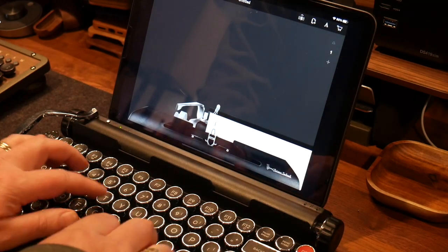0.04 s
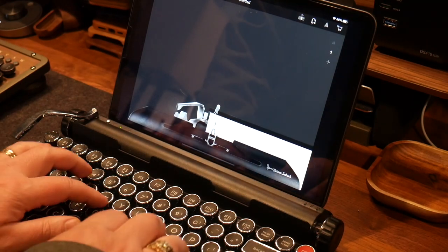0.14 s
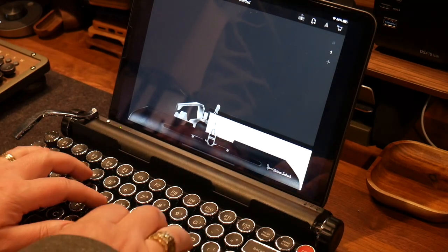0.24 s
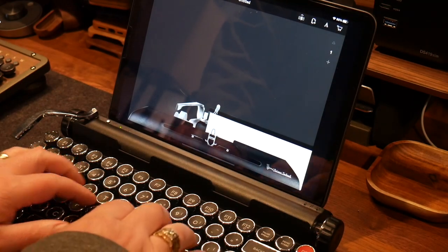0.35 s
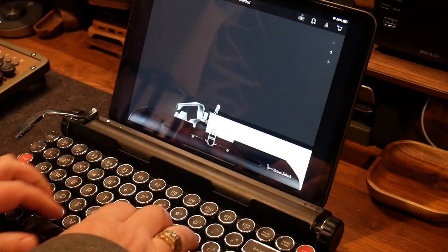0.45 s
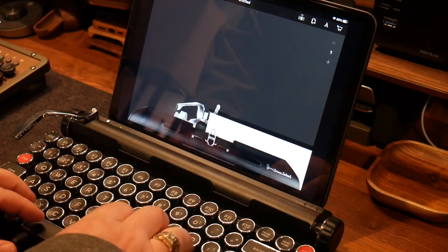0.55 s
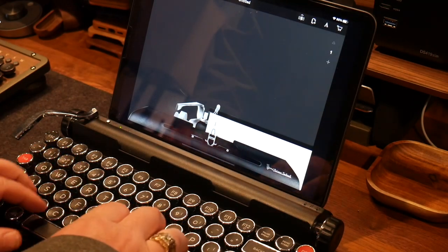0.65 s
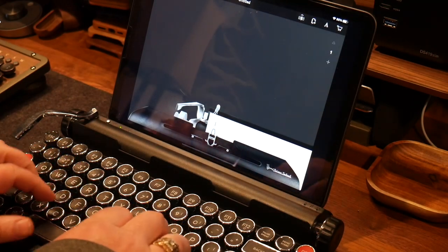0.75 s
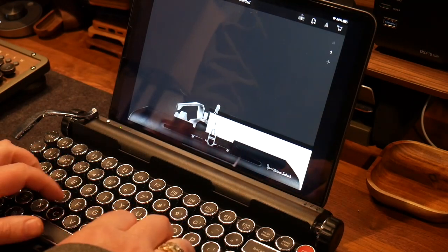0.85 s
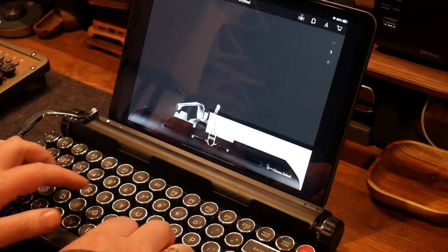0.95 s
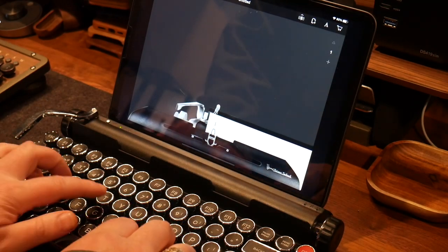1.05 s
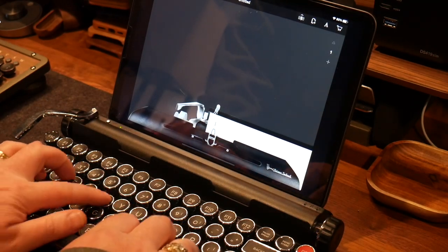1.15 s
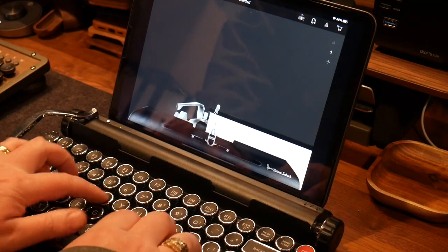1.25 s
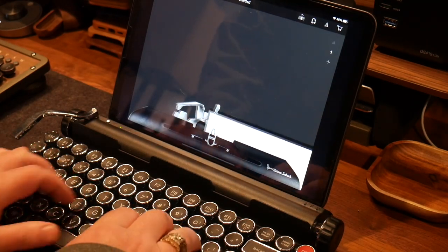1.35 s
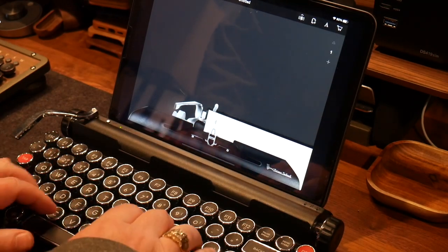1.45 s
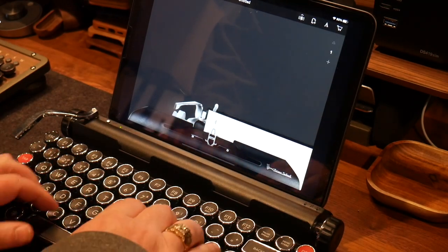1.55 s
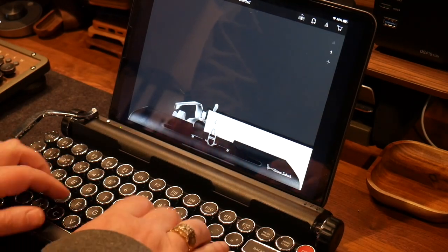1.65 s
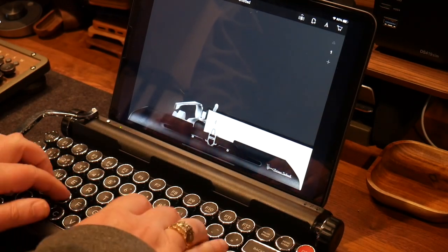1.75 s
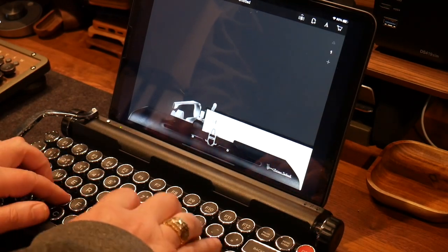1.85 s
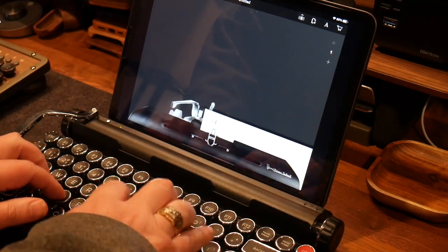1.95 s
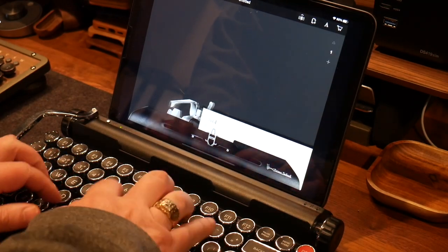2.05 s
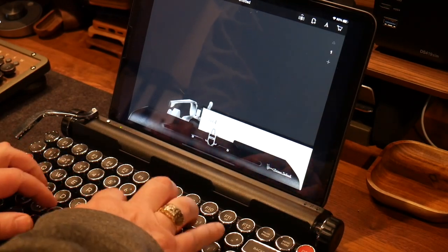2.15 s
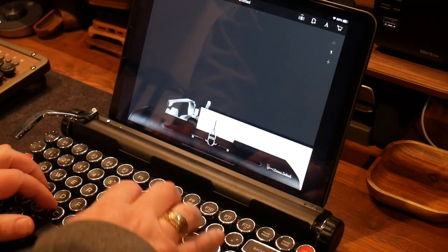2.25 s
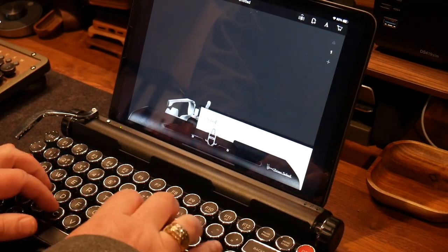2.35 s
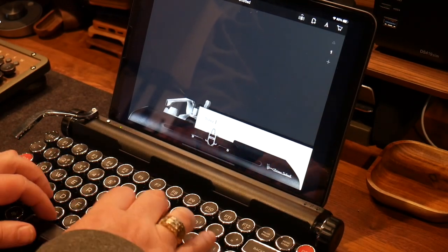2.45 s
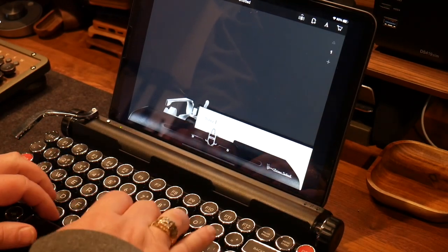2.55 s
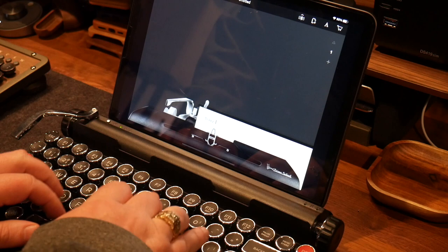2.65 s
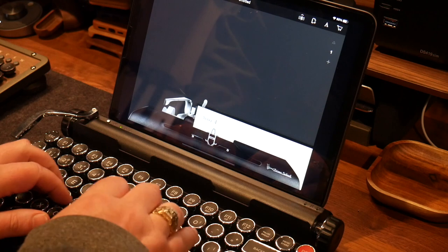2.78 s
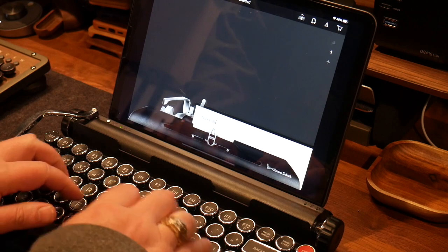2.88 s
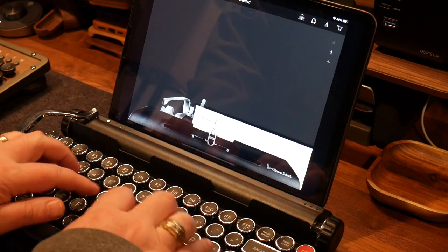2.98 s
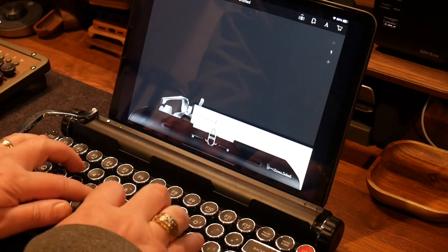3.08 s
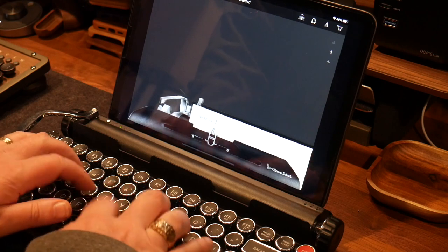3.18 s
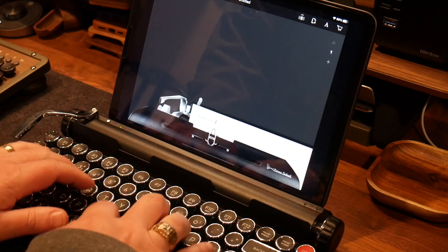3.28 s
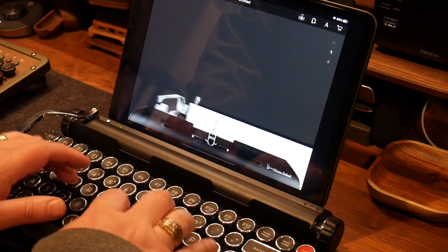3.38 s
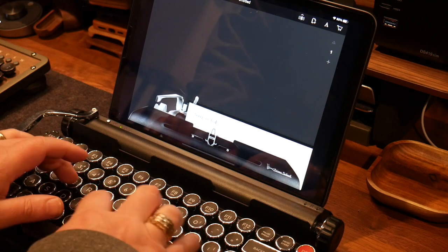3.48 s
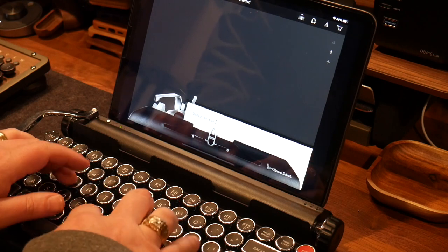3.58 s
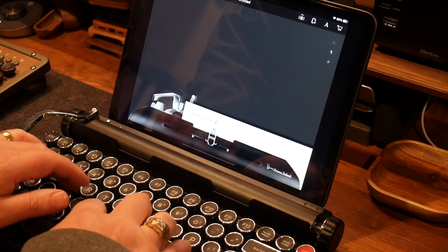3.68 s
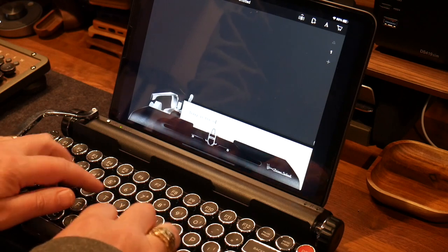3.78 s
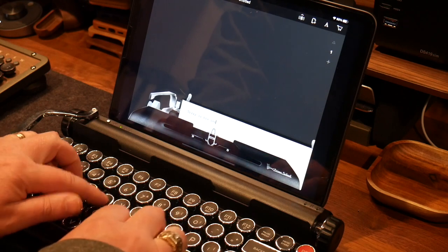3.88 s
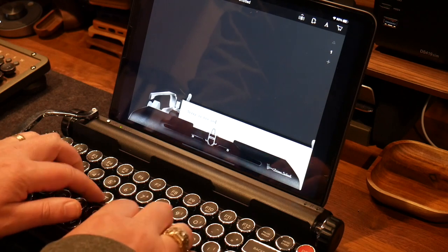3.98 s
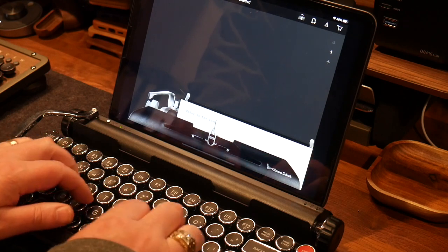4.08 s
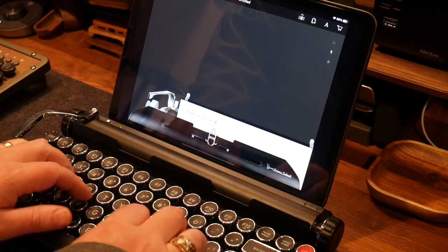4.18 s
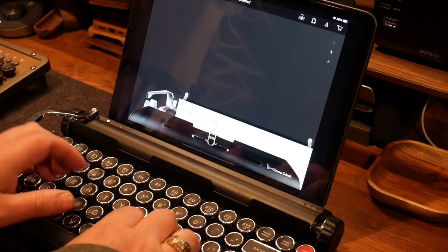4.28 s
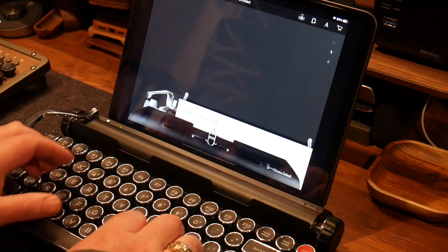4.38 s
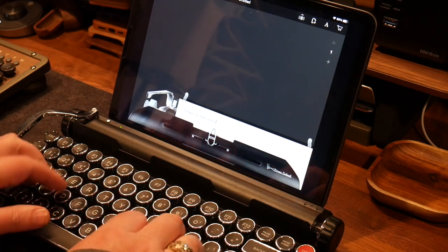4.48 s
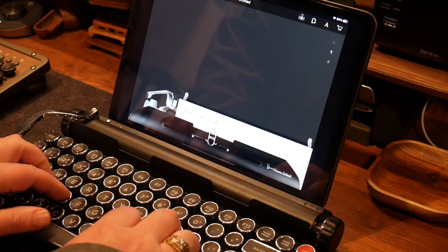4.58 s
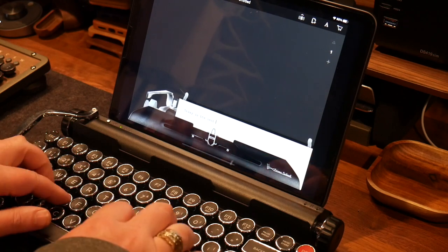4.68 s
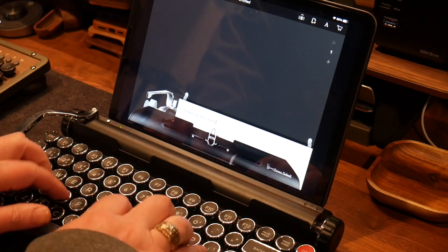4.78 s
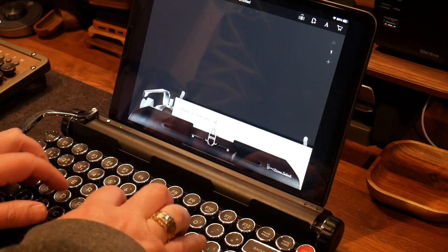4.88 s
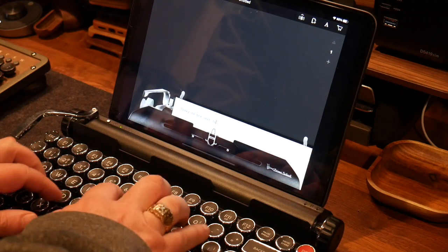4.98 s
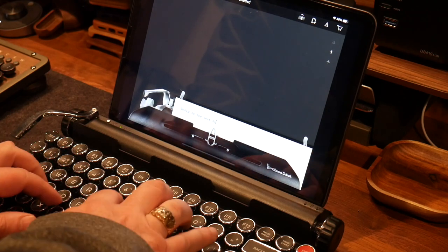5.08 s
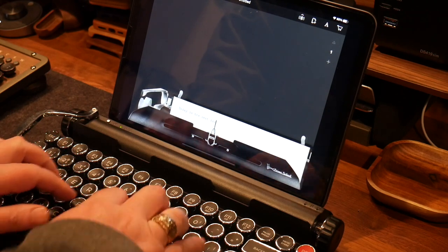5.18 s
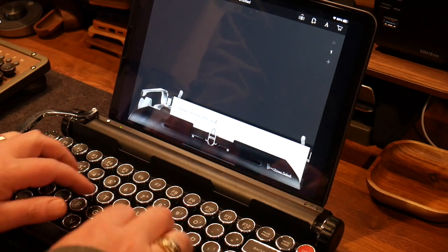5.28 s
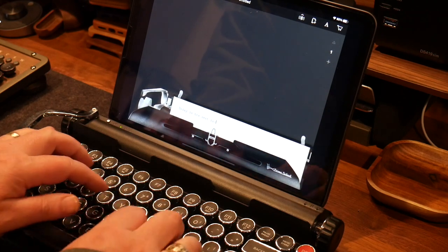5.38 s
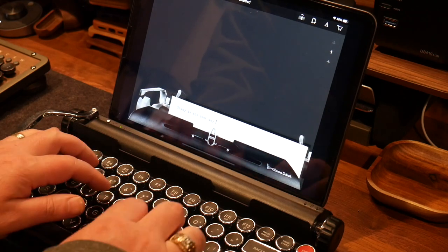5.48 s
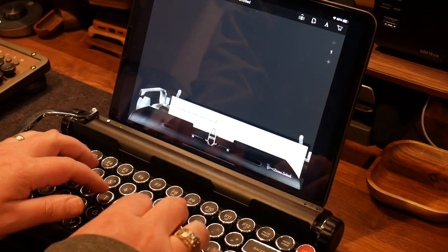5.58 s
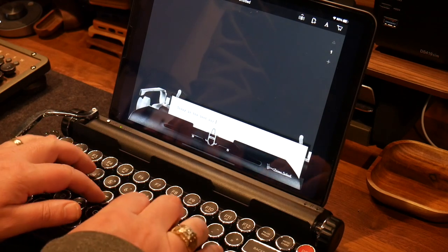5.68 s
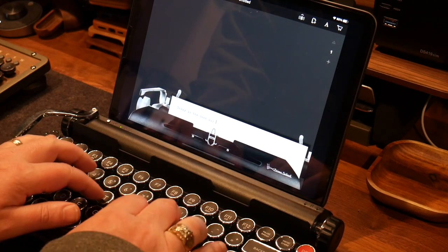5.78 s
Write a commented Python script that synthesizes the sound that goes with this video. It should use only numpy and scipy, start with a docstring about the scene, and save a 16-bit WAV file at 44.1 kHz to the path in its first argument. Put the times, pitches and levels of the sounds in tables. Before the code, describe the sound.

A small quiet room with soft low air and a faint wavering hum, heard close in stereo. For the first second there is almost nothing: a fading faint crackle and a thin fingertip tick at 0.8 s. A light key return knocks at 1.2 s, then the first firm keystroke lands at 1.5 s with a dull, short palm rub around it. Rapid clicky keystrokes follow from 1.9 to 2.3 s, bright and springy, each with a softer return knock. A hollow, lower space-bar clack comes at 2.5 s. Typing thickens from 2.7 to 4.15 s, with space strokes at 3.1 and 3.6 s and small finger rubs. Another space clack at 4.3 s leads into lighter ticks and releases. Strong keys hit at 4.9 s, nearly doubled, and 5.2 s; a last space clack at 5.55 s leaves quiet air and a very faint release at 5.8 s.

```python
"""Fast typing on a typewriter-style mechanical keyboard that stands on a wooden desk in a small quiet room.
Each switch clicks, the key bottoms out, and on release it clicks again and knocks against its top stop:
every contact is a short burst of random impacts, coloured by the resonances of caps and springs.
The thumb taps the long space bar and mostly drives it down with a hollow clack, built from decaying sines.
Filtered noise makes a dull rub, the room's tail, the soft air and the faint hum that fills the pauses."""
import sys
import numpy as np
from scipy import signal
from scipy.fft import rfft, irfft
from scipy.io import wavfile
from scipy.ndimage import uniform_filter1d

SR = 44100
rng = np.random.default_rng(int(sys.argv[2]) if len(sys.argv) > 2 else 0)


def to_wav(s):
    """Save 16-bit WAV."""
    ch = np.atleast_2d(s).T  # columns
    pcm = np.round(np.clip(ch, -1, 1) * 32767)  # PCM
    wavfile.write(sys.argv[1], SR, pcm.astype(np.int16))


N = 257103

# keys that go down, levels before the gains of each part: bottom_s, level_db, case_knock_db, treble_db,
# travel_since_click_ms, cap_ring_hz
PRESSES = [(1.4703, -14.5, 4.5, -7.5, 12.5, 2520), (1.8724, -16.5, 2.5, -0.5, 9, 4460),
           (1.9024, -26.5, 4, -11, 4, 2800), (1.9715, -14.5, 2.5, -0.5, 8.6, 4500),
           (2.0528, -17.5, 0, 1.5, 2.2, 3420), (2.2913, -14.5, 2.5, 0.5, 7.3, 4500),
           (2.3106, -24, 9.5, -5, 8, 1650), (2.736, -17, 1.5, 2, 2, 3430), (2.9602, -16, -1, -1, 4.3, 4340),
           (3.2731, -15.5, 2.5, 0, 5.3, 3140), (3.4182, -16, 5, 2.5, 2.3, 3430),
           (3.462, -18, 4.5, -0.5, 3.6, 3460), (3.7713, -15, 0, -2, 7.2, 4460),
           (3.8493, -15, 4, 2.5, 7.9, 3200), (3.9098, -18, 6, 4, 1.76, 3370),
           (4.1116, -15.5, 6, 2, 8.4, 4570), (4.8939, -13, 4.5, 3.5, 6.1, 3300),
           (4.9132, -19.5, 2.5, -1, 2, 3450), (5.2102, -16, 1.5, 1.5, 2, 3500)]
# thumb landings on the space bar: tap_s, level_db, rattle_decay_ms
BAR_TAPS = [(2.463, -29.5, 2.6), (2.6785, -39.5, 2.5), (3.0552, -31, 2), (3.5303, -30.5, 3.8),
            (4.0402, -41.5, 4.4), (4.2759, -31, 2), (5.4693, -28, 1.16)]
# space bar hitting bottom, levels before the gains of each part: bottom_s, level_db
BAR_STROKES = [(2.501, -25), (3.119, -25), (3.61, -23.5), (4.3356, -22.5), (5.5506, -22.5)]
# spectrum of a switch click: frequency_hz, density_db_per_hz
CLICK_COLOUR = [(100, -45.5), (500, -11.5), (1100, -10), (1700, -1.5), (2500, -3), (4000, 2.5), (6500, 0.5),
                (9000, -2), (10500, -8.5), (13500, -6.5), (16000, -22)]
# spectrum of a key at its top stop, also of the faint crackle: frequency_hz, density_db_per_hz
RETURN_COLOUR = [(100, -25), (300, -19), (500, -5), (750, -12), (1100, -7.5), (1700, -6.5), (2500, -3),
                 (4000, -5.5), (6500, -11.5), (9000, -3.5), (10500, -21.5), (13500, -26.5), (16000, -42)]

MS = 1e-3
# samples kept for one contact, and how many of them come before the strike
SIZE, LEAD = 4096, 400
HZ = np.maximum(np.fft.rfftfreq(SIZE, 1 / SR), 1)
TIME = np.arange(N) / SR
# each contact fades in and out at its ends
FADE = signal.windows.tukey(SIZE, .1)


def from_db(db):
    """Amplitude ratio: 20 dB for each factor of ten."""
    return 10 ** (np.asarray(db) / 20)


def rms_one(x):
    """Normalisation of the signal power to one."""
    return x / np.sqrt(np.mean(x ** 2) + 1e-20)


def at_hz(points, hz, axis=1):
    """Interpolation along log frequency of one column of a table."""
    table = np.array(points, float)
    return np.interp(np.log(hz), np.log(table[:, 0]), table[:, axis])


def add(track, s, sound):
    """Superposition: a sound is added to a track from time s on."""
    start = max(round(s * SR), 0)
    part = sound[:max(N - start, 0)]
    track[start:start + len(part)] += part


def mode(hz, t60, swell_ms):
    """Damped normal mode: a sine decays by 60 dB in t60 seconds after a moment of build-up."""
    t = TIME[:SR // 2]
    swell = 1 - np.exp(-(1000 * t / swell_ms) ** 2)
    phase = rng.uniform(0, 2 * np.pi)
    return swell * from_db(-60 * t / t60) * np.sin(2 * np.pi * hz * t + phase)


def resonance(hz, width, boost_db):
    """Lorentzian resonance: a peak that rings after the contact, or a dip."""
    return 1 + (from_db(boost_db) - 1) / (1 + 2j * (HZ - hz) / width)


def key_body(depth):
    """Resonances in series, shared by all caps and switch springs; light contacts wake them less."""
    # boosts before the depth of the contact: frequency_hz, width_hz, boost_db
    body_peaks = [(2534, 72, 10), (3405, 150, 6.5), (4210, 49, 6.5), (5220, 80, 7), (6560, 310, 4.5),
                  (7896, 1450, -13), (8545, 106, 9.5), (8896, 91, 9), (9100, 45, 10)]
    return np.prod([resonance(hz, width, depth * boost_db) for hz, width, boost_db in body_peaks], axis=0)


def chatter(decay_ms, slide_db, rise_share=0.32, grain_db=3.5, ring_db=-20, ring_ms=14.0, slide_ms=10.6,
            ragged_hz=885.3, ragged_db=3.5, scatter=.35):
    """Random impact excitation: the stem slides, tiny impacts bunch up, the plastic rings briefly."""
    ms = (np.arange(SIZE) - LEAD) / SR * 1000
    before, after = np.minimum(ms, 0), np.maximum(ms, 0)
    decay_ms = max(decay_ms, .2)
    strike = np.exp(before / (rise_share * decay_ms) - after / decay_ms)
    slide = from_db(slide_db) * np.exp(before / slide_ms)
    ring = from_db(ring_db) * np.exp(-after / ring_ms)
    skirt = np.where(ms < 0, slide, ring)
    impacts = rng.standard_normal((2, SIZE))
    burst = rfft((strike + skirt) * impacts[0] * from_db(grain_db * impacts[1]))
    # level the broad spectrum, which the colour tables then shape
    flat_burst = burst / np.sqrt(uniform_filter1d(abs(burst) ** 2, size=70))
    # each strike point feeds the modes unevenly, and some of them a little later than others
    knots = np.arange(0, SR / 2, ragged_hz)
    strength, lateness = (np.interp(HZ, knots, row) for row in rng.standard_normal((2, len(knots))))
    delay_s = lateness * scatter * decay_ms * MS
    phase = 2 * np.pi * np.cumsum(delay_s) * SR / SIZE
    return flat_burst * from_db(ragged_db * strength) * np.exp(-1j * phase)


def contacts(hits, colour, lag_cycles, slide_db, depth, ping_db=0, tick_db=0, cap_db=6.5,
             cap_width_hz=280.0, early_share=.36):
    """Impact filtered by the key body; dispersive bending waves in the case bring the lows later.

    Columns of hits: strike_s, level_db, case_knock_db, treble_db, rattle_decay_ms, cap_ring_hz.
    """
    out = np.zeros(N)
    dispersion = np.exp(-2j * np.pi * lag_cycles * np.log(HZ + 150))
    body = key_body(depth) * from_db(at_hz(colour, HZ)) * dispersion
    for s, level_db, knock_db, treble_db, decay_ms, cap_hz in hits:
        ping, tick = treble_db + ping_db, treble_db + tick_db
        touch = [(1400, knock_db), (2600, 0), (5000, 0), (7000, ping), (9500, ping), (11500, tick)]
        cap = resonance(cap_hz, cap_width_hz, cap_db)
        spectrum = chatter(decay_ms, slide_db) * body * cap * from_db(at_hz(touch, HZ))
        sound = FADE * irfft(spectrum)
        # the level of a contact is its energy spread over 5 ms
        sound = sound * np.sqrt(.005 * SR / np.sum(sound ** 2))
        add(out, s - LEAD / SR - early_share * decay_ms * MS, from_db(level_db) * sound)
    return out


def background(air_db=-60.5, hum_width_hz=4.1):
    """Stationary noise: soft room air, wide in the bass; narrow bands make an appliance's wavering hum."""
    # spectrum of the air before levelling: frequency_hz, density_db_per_hz
    air_colour = [(25, -32), (60, -32.5), (110, -20.5), (150, -17), (220, -15.5), (330, -17.5),
                  (450, -14.5), (620, -21.5), (780, -23), (1400, -29.5), (3300, -36), (7200, -34.5),
                  (8000, -38.5), (16000, -42.5)]
    # lines of the hum: frequency_hz, level_db
    hum_lines = [(143, -89), (214, -81), (361, -72.5), (436, -83), (580, -68), (636, -72.5)]
    # side against mid: frequency_hz, side_db
    air_width = [(60, 10.0), (150, -2), (600, 2.5), (4000, -3.0)]
    hz = np.maximum(np.fft.rfftfreq(N, 1 / SR), 1)
    mid, side, hum = rfft(rng.standard_normal((3, N)))
    colour = from_db(at_hz(air_colour, hz))
    mid = irfft(mid * colour, N)
    side = irfft(side * colour * from_db(at_hz(air_width, hz)), N)
    out = from_db(air_db) * (mid + side * [[1], [-1]]) / np.std(mid)
    for line_hz, level_db in hum_lines:
        line = irfft(hum / (1 + (2 * (hz - line_hz) / hum_width_hz) ** 2), N)
        out = out + from_db(level_db) * rms_one(line)
    return out


def room(x):
    """Diffuse reverberation: a tail builds up and dies band by band; mid and side ring independently."""
    # the room's answer: frequency_hz, level_against_direct_db, t60_s, build_up_ms
    answer = [(80, -13, 0.63, 14), (196, 9.5, 0.33, 6.3), (316, 4.5, 0.33, 2.5), (566, -2.5, 0.42, 3.7),
              (930, 2, 0.15, 2.2), (1880, -8, 0.27, 5.6), (4270, -3, 0.25, 2.5), (6630, -3, 0.21, 1.3),
              (8400, -9, 0.22, 2.4), (14400, -5, 0.12, 2)]
    # width of the answer: frequency_hz, side_against_mid_db
    answer_width = [(150, -10), (500, -7), (1500, -3), (3000, -6.5), (5000, -13), (8500, -8), (12000, -4.5)]
    t = TIME[:SR * 2 // 3]
    edges = 60 * 2 ** np.arange(0, 8.4, 1 / 3)  # third octaves
    # neighbouring bands use different noise
    white = rng.standard_normal((2, 2, len(t)))
    response = 0
    for k, (low, high) in enumerate(zip(edges, edges[1:])):
        hz = np.sqrt(low * high)
        band_filter = signal.butter(2, [low, high], "band", fs=SR, output="sos")
        decay = from_db(-60 * t / at_hz(answer, hz, axis=2))
        build_up = 1 - np.exp(-(1000 * t / at_hz(answer, hz, axis=3)) ** 2)
        band = signal.sosfilt(band_filter, white[k % 2]) * decay * build_up
        # a direct impulse has this share of its energy in the band
        share = 2 * (high - low) / SR
        gain = from_db(at_hz(answer, hz) + np.array([[0], [at_hz(answer_width, hz)]]))
        response = response + gain * band * np.sqrt(share / np.sum(band ** 2, axis=1, keepdims=True))
    mid, side = signal.fftconvolve(x[None], response, axes=1)[:, :N]
    return mid + side * [[1], [-1]]


def direct(x, bounce_ms=0.607624):
    """Interference in the near field: a delayed bounce off the desk reaches the two sides unequally."""
    # the two microphones: frequency_hz, left_minus_right_db, side_db
    microphone_pair = [(60, 2, -10), (200, -6.5, -6.5), (503, 2.5, -14.5), (1080, 1.5, -16),
                       (2200, -0.5, -15), (4500, 1, -26), (7000, 0, -35), (9000, 5.5, -9),
                       (12400, -3.5, -12)]
    hz = np.maximum(np.fft.rfftfreq(N, 1 / SR), 1)
    sides = np.array([[1], [-1]])
    delay = np.exp(-2j * np.pi * hz * bounce_ms * MS)
    bounce = from_db(at_hz(microphone_pair, hz, axis=2)) * delay
    balance = from_db(sides * at_hz(microphone_pair, hz) / 2)
    return irfft(rfft(x) * (balance + sides * bounce), N)


def palm(rub_db=-51.0, rub_hz=480.0, width_hz=78.0, middle_s=1.554, spread_s=0.16):
    """Friction noise through a resonance: the heel of the hand rubs the case, short and dull."""
    grip = signal.lfilter(*signal.iirpeak(rub_hz, rub_hz / width_hz, fs=SR), rng.standard_normal(N))
    grip = signal.sosfilt(signal.butter(2, 2 * rub_hz, fs=SR, output="sos"), grip)
    return from_db(rub_db) * rms_one(grip) * np.exp(-((TIME - middle_s) / spread_s) ** 2)


def crackle(per_s=80, gain_db=-3.0):
    """Dense random impacts, faint: a fading hiss at the start, later small rubs of fingers on the caps."""
    # course of the crackle before the gain and a scatter of 4 dB either way: time_s, level_db
    crackle_levels = [(0, -61), (1.15, -94), (1.3, -44), (1.6, -44), (2.4, -67), (3.1, -39.5), (3.9, -47.5),
                      (4.05, -39), (4.45, -57.5), (4.65, -55.5), (5.15, -36.5), (5.4, -54), (5.83, -59)]
    draws = rng.random((round(per_s * N / SR), 2))
    times = draws[:, 0] * N / SR
    levels = np.interp(times, *np.transpose(crackle_levels)) + 8 * (draws[:, 1] - .5)
    grains = [(s, db + gain_db, 0, 0, 6, 3400) for s, db in zip(times, levels)]
    return contacts(grains, RETURN_COLOUR, lag_cycles=1.2, slide_db=-2.0, depth=.15)


def desk(thump_db=-17.0, desk_hz=186.8, t60=0.27, swell_ms=74.0):
    """Plate mode driven by impact: keys that hit bottom set the desk top humming a moment later."""
    out = np.zeros(N)
    for s, level_db, *touch in PRESSES:
        add(out, s, from_db(level_db + thump_db) * mode(desk_hz, t60, swell_ms))
    return out


def space_bar(rattle_hz=1068, rattle_t60=0.049, rattle_db=4, lag_cycles=3.556, early_ms=4.74):
    """Modal synthesis: a tap rings the loose bar; a stroke wakes the hollow modes, lows last."""
    # modes of the space bar and the case under it: frequency_hz, level_db, t60_s, swell_ms
    hollow_modes = [(195.3, -7.5, 0.07, 5.1), (428, -4, 0.084, 9.4), (488, 2, 0.061, 6.2),
                    (519.5, -6, 0.13, 1.9), (633, -17, 0.33, 10), (912, -1.5, 0.072, 3.5),
                    (1013, 5, 0.037, 1.65), (1100, -36, 0.099, 1.7), (1267, -21, 0.17, 2),
                    (1388, -9, .1, 4.7), (1556, 6.5, 0.057, 2.3), (1603, -0.5, 0.079, 4.9),
                    (1732, 1, 0.062, 1.2)]
    out = np.zeros(N)
    rattle = mode(rattle_hz, rattle_t60, swell_ms=.5)
    for s, level_db, decay_ms in BAR_TAPS:
        add(out, s, from_db(level_db + rattle_db) * rattle)
    for hz, mode_db, t60, swell_ms in hollow_modes:
        ring = mode(hz, t60, swell_ms)
        for s, level_db in BAR_STROKES:
            add(out, s + lag_cycles / hz - early_ms * MS, from_db(level_db + mode_db) * ring)
    return out


def bar_taps(bar_hz=1820.0, lead_ms=12.3, click_db=-41.5, click_ms=1.8, click_hz=6600.0):
    """Impact across free play: a faint tick of the thumb, then the loose bar takes up its slack."""
    # spectrum of the tapped bar: frequency_hz, density_db_per_hz
    tap_colour = [(100, -29), (500, -1), (750, -1), (1100, 1), (1700, -0.5), (2500, -2), (4000, -9.5),
                  (6500, -11), (9000, -20.5), (13500, -23), (16000, -30)]
    clicks = [(s - lead_ms * MS, click_db, 0, 0, click_ms, click_hz) for s, db, decay_ms in BAR_TAPS]
    taps = [(s, db, 0, 0, decay_ms, bar_hz) for s, db, decay_ms in BAR_TAPS]
    click_sound = contacts(clicks, CLICK_COLOUR, lag_cycles=1.2, slide_db=-29, depth=.45,
                           ping_db=3.5, tick_db=1.0)
    tap_sound = contacts(taps, tap_colour, lag_cycles=1.3, slide_db=-13, depth=.46,
                         ping_db=6.5, tick_db=-1.0)
    return click_sound + tap_sound


def bar_strokes(gain_db=1.0, decay_ms=2.1, bar_hz=1660.0, lead_ms=11.5,
                click_db=-2.0, click_knock_db=11.5, click_ms=1.75, click_hz=6800.0):
    """Two impacts in succession: the bar's switch clicks loudly, then the bar hits bottom."""
    # spectrum of the bar at its bottom: frequency_hz, density_db_per_hz
    stroke_colour = [(100, -22), (500, 1), (750, -3), (1100, 10), (1700, -6), (2500, 5.5), (4000, -0.5),
                     (6500, 0), (9000, 3), (10500, -29.5), (13500, -4.5), (16000, -32)]
    clicks, bottoms = [], []
    for s, db in BAR_STROKES:
        clicks.append((s - lead_ms * MS, db + click_db, click_knock_db, 0, click_ms, click_hz))
        bottoms.append((s, db + gain_db, 0, 0, decay_ms, bar_hz))
    click_sound = contacts(clicks, CLICK_COLOUR, lag_cycles=1.2, slide_db=-36, depth=0.92,
                           ping_db=8.5, tick_db=2.1)
    bottom_sound = contacts(bottoms, stroke_colour, lag_cycles=1.2, slide_db=-9.5, depth=0.88)
    return click_sound + bottom_sound


def ticks(cap_hz=7030.0):
    """Light impact: a fingertip lands on a cap with a thin tick."""
    # fingertip landings: tick_s, level_db, case_knock_db, treble_db, rattle_decay_ms
    landings = [(0.8306, -30.5, -11, 4, 0.71), (1.2746, -39.5, -6, -4, 0.93), (1.346, -43, 10, -9, 1.4),
                (1.41, -40.5, 8, -1, 1.7), (1.658, -29.5, 13.5, -5, 1.1), (1.802, -29.5, -20, -0.5, 1.5),
                (3.0894, -28.5, -3, 5, 1.5), (3.2282, -30, 4, -3, 1.13), (3.673, -28, 5, 1, 0.63),
                (4.6035, -43, 10, 1, 3.7), (4.6802, -29.5, -12, 2, .8), (4.7485, -29.5, -15, 1, 1),
                (5.3464, -24.5, -1, 1.5, 1.06)]
    hits = [(*landing, cap_hz) for landing in landings]
    return contacts(hits, CLICK_COLOUR, lag_cycles=1.2, slide_db=-26.5, depth=0.64, ping_db=5.5, tick_db=6.5)


def releases(gain_db=0.58, return_ms=6.1, click_knock_db=4.5, click_ms=1.5,
             snap_db=-22.5, snap_rattle_ms=.85, braked_rattle_per_db=0.2456):
    """Spring return: the switch clicks on the way up, then the key knocks against its top stop."""
    # keys that spring back, and one second knock just after a press (at 3.2853 s); levels and knocks
    # before the gains of each part: knock_s, level_db, case_knock_db, treble_db,
    # click_against_knock_db, cap_ring_hz
    return_knocks = [(1.1732, -25, -3, -5, -2.5, 2700), (1.2935, -37, 10.5, -1, -10, 3560),
                     (1.6277, -32.5, 7, -6, -7, 2820), (1.6908, -23, -3, -4.5, -6.5, 2710),
                     (1.8255, -32.5, 3, -3, -21, 3370), (2.1266, -21, -5, -10, -9.5, 2880),
                     (2.2019, -32, 2.5, -4, -6.5, 1910), (2.5739, -24.5, -5, -6, -7.5, 1940),
                     (2.7934, -28.5, -2, -4.5, -3, 1970), (2.9138, -32.5, -3, 2, -7, 3570),
                     (2.9383, -21, 4.5, 5, -1.5, 2160), (3.1766, -27.5, 5, 0, -9, 2870),
                     (3.2358, -29, -4, 0.5, -22, 3020), (3.2853, -23, -7.5, -1, -3, 4260),
                     (3.3929, -36, 1, 7.5, -6, 2750), (3.5652, -25, -5, -1, -8, 1740),
                     (3.9173, -22.5, -9.5, -16, -15, 2700), (4.149, -21.5, 1.5, 0.5, -1.5, 1650),
                     (4.6275, -39, 10.5, 4, -13, 3600), (4.6938, -28.5, -4.5, -14, -8.5, 3320),
                     (4.7595, -30, -5.5, -3, -7, 3750), (4.8173, -29, -0.5, -4, -14, 1840),
                     (5.0686, -21, -4.5, -5.5, -11.5, 2840), (5.8224, -42, 5.5, -1, -5, 2610)]
    clicks, stops = [], []
    for s, db, knock_db, treble_db, click_db, cap_hz in return_knocks:
        # the spring sets the time from switch click to top stop
        clicks.append((s - return_ms * MS, db + click_db, knock_db + click_knock_db, 0, click_ms, cap_hz))
        # a clean snap is loud and short; the more the finger brakes it, the longer it rattles
        rattle_ms = snap_rattle_ms * np.exp(braked_rattle_per_db * (snap_db - db))
        stops.append((s, db + gain_db, knock_db, treble_db, rattle_ms, cap_hz))
    click_sound = contacts(clicks, CLICK_COLOUR, lag_cycles=1.2, slide_db=-14, depth=0.24,
                           ping_db=7, tick_db=2, cap_db=9)
    stop_sound = contacts(stops, RETURN_COLOUR, lag_cycles=1.3, slide_db=-20, depth=0.11,
                          ping_db=-3.5, tick_db=5.5, cap_width_hz=450)
    return click_sound + stop_sound


def presses(gain_db=0.85, rattle_at_1_ms=1.3, rattle_growth=.34,
            click_db=-10.5, click_ms=2.6, click_hz=4220.0):
    """Two impacts in succession: the switch clicks on the way down, then the key bottoms out."""
    # spectrum of a key at its bottom: frequency_hz, density_db_per_hz
    bottom_colour = [(60, -32), (300, -20.5), (500, -8.5), (750, -20), (1100, -14.5), (1700, -6),
                     (2500, -5), (4000, -3), (6500, -6.5), (9000, 0.5), (10500, -21), (13500, -14.5),
                     (16000, -35)]
    clicks, bottoms = [], []
    for s, db, knock_db, treble_db, travel_ms, cap_hz in PRESSES:
        clicks.append((s - travel_ms * MS, db + click_db, 0, 0, click_ms, click_hz))
        # a slower key rattles longer, by a power of its travel time
        rattle_ms = rattle_at_1_ms * travel_ms ** rattle_growth
        bottoms.append((s, db + gain_db, knock_db, treble_db, rattle_ms, cap_hz))
    click_sound = contacts(clicks, CLICK_COLOUR, lag_cycles=1.2, slide_db=-22, depth=0.8,
                           ping_db=9, tick_db=1)
    bottom_sound = contacts(bottoms, bottom_colour, lag_cycles=2.8, slide_db=-13.5, depth=0.91,
                            ping_db=2.5, tick_db=.4, cap_width_hz=340)
    return click_sound + bottom_sound


def scene():
    """Superposition of the direct field, the reverberant field and the background."""
    keys = presses() + releases() + ticks() + bar_taps() + bar_strokes() + crackle() + palm()
    bar = space_bar()  # its hollow modes sound mostly close by
    near = direct(keys + bar + desk())
    return near + room(keys + from_db(-9.5) * bar) + background()


def record(dry):
    """Low-pass filtering: an elliptic filter cuts the top steeply above 16 kHz."""
    return signal.sosfilt(signal.ellip(10, .1, 80, 16000, fs=SR, output="sos"), dry)


dry = scene()
out = record(dry)
to_wav(out)
```